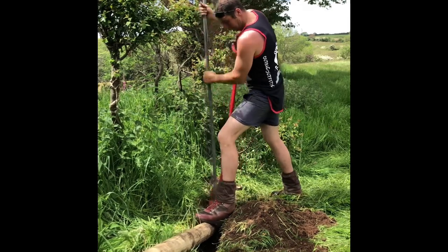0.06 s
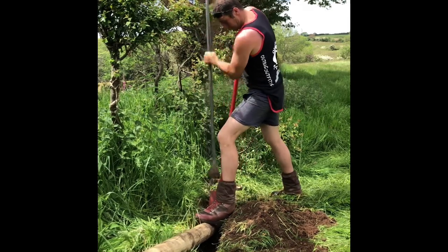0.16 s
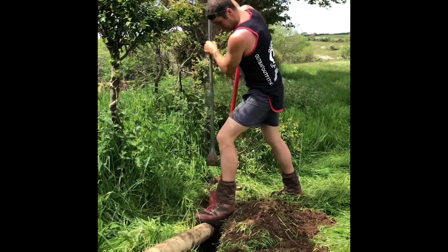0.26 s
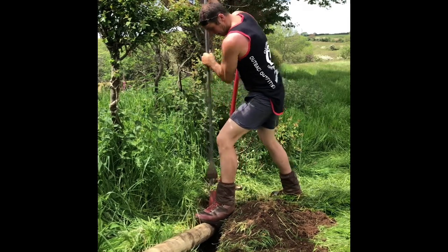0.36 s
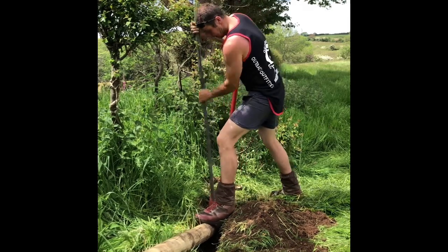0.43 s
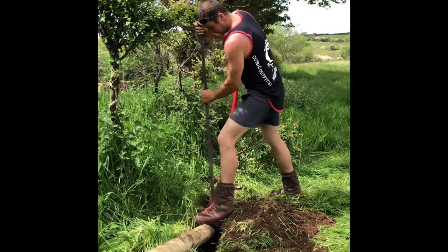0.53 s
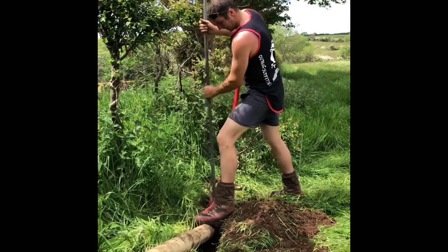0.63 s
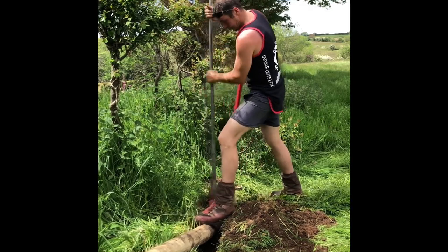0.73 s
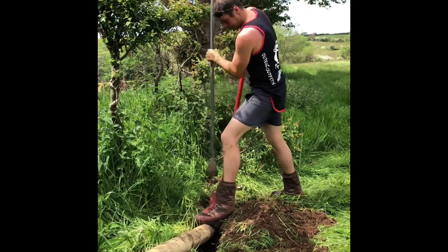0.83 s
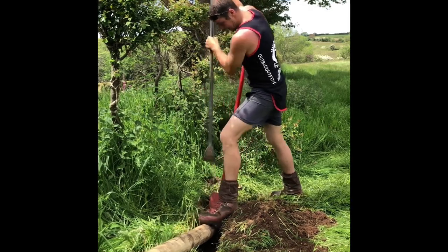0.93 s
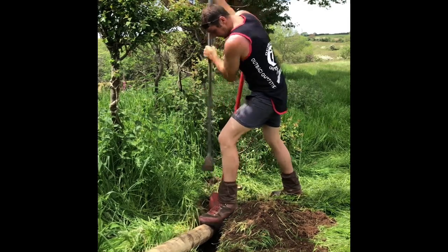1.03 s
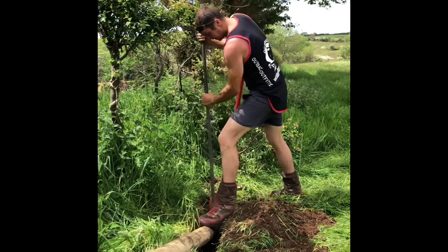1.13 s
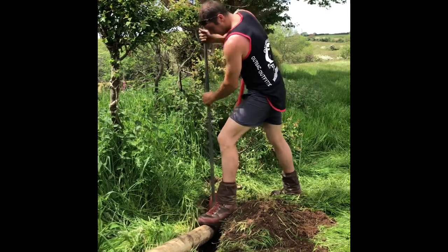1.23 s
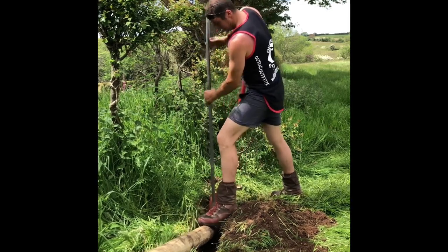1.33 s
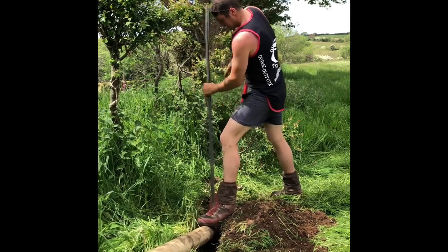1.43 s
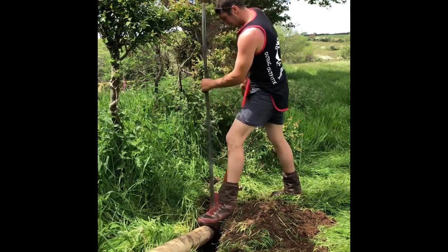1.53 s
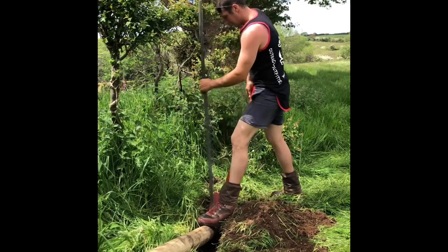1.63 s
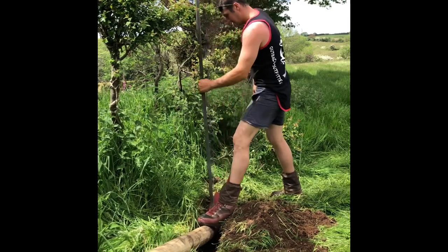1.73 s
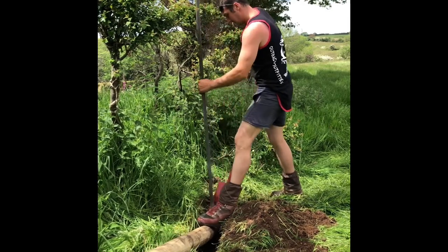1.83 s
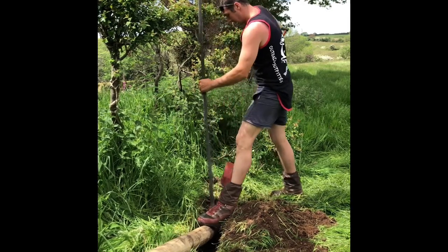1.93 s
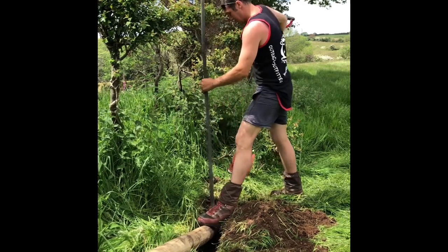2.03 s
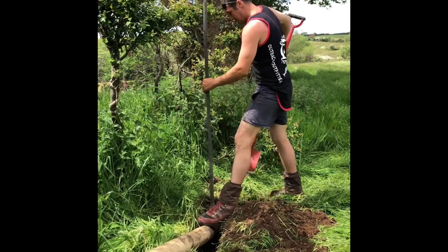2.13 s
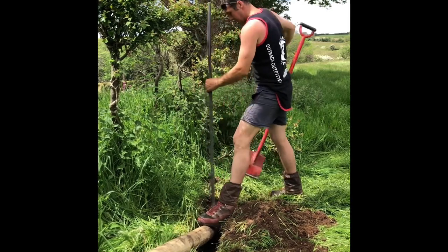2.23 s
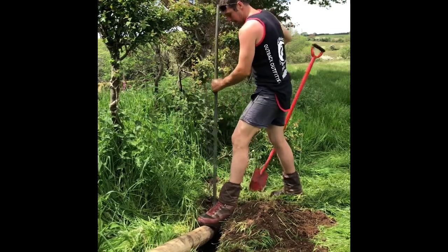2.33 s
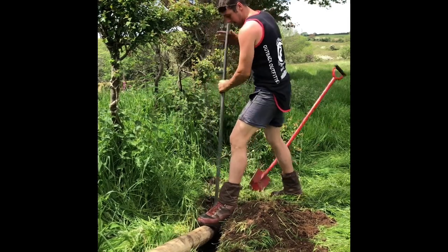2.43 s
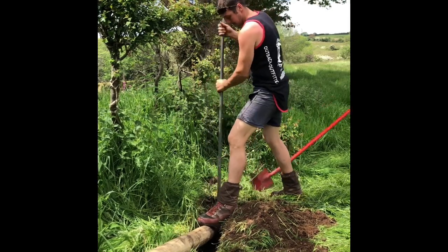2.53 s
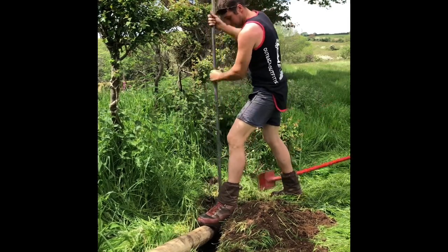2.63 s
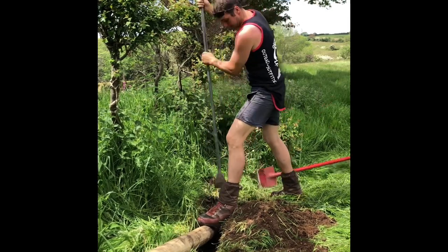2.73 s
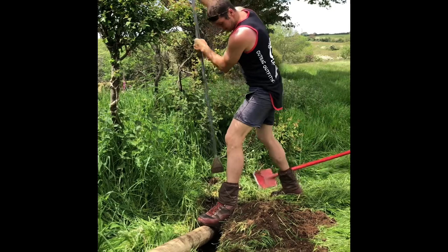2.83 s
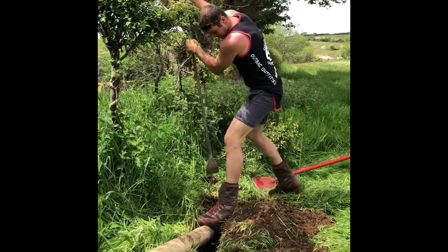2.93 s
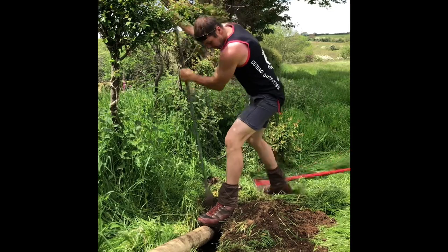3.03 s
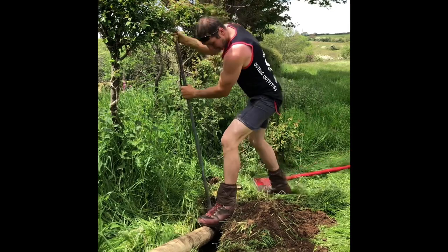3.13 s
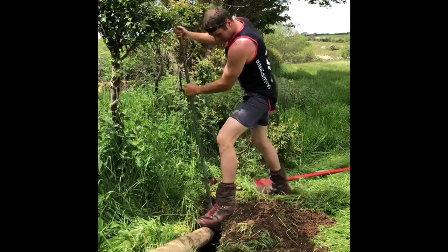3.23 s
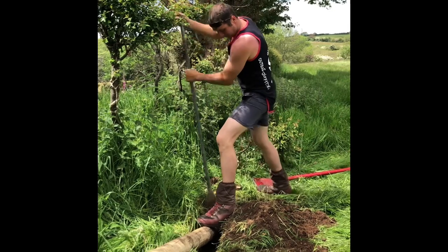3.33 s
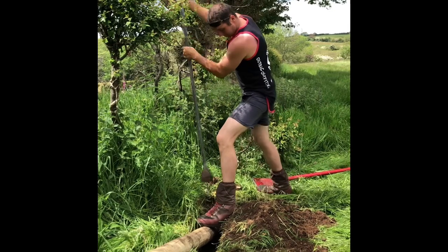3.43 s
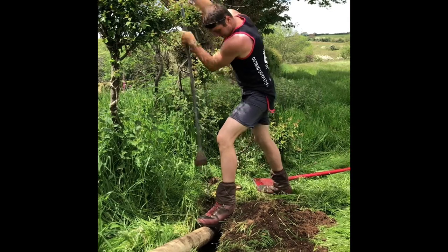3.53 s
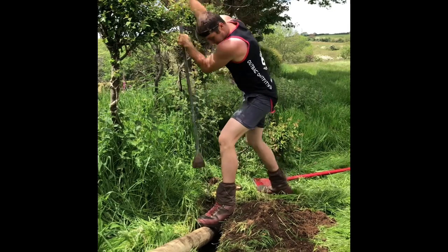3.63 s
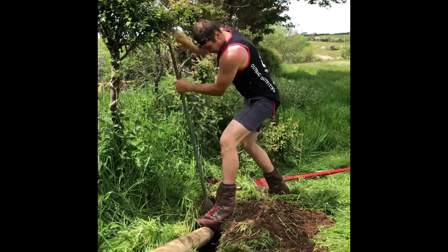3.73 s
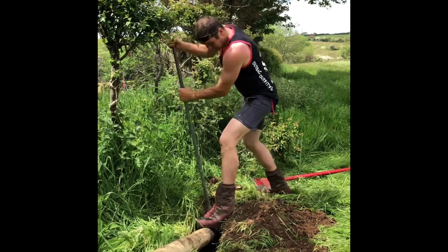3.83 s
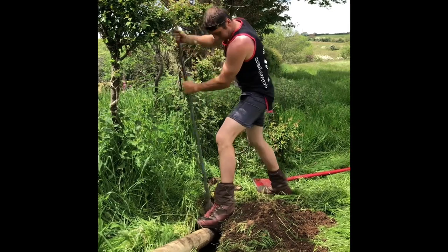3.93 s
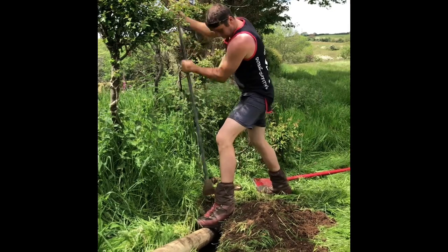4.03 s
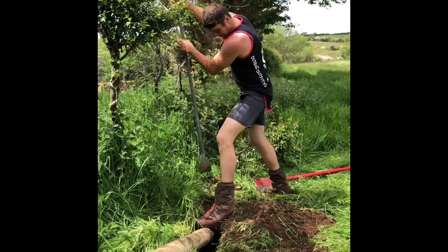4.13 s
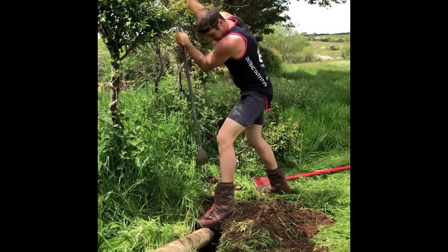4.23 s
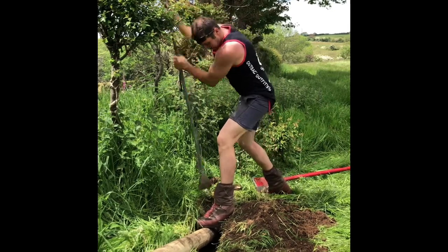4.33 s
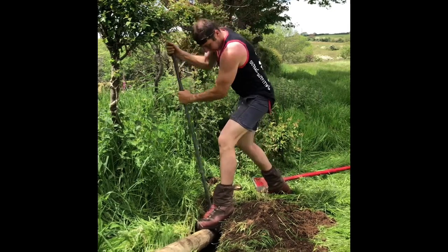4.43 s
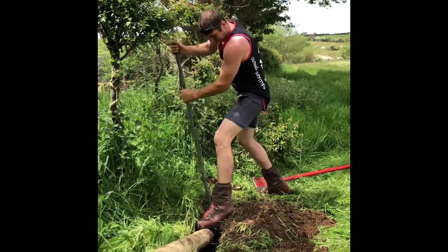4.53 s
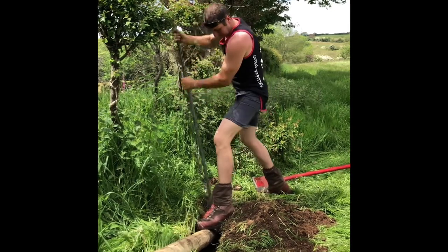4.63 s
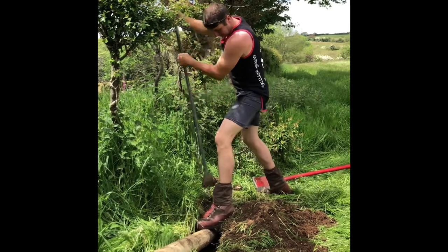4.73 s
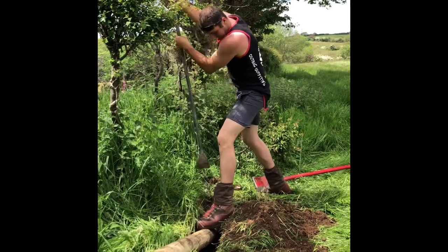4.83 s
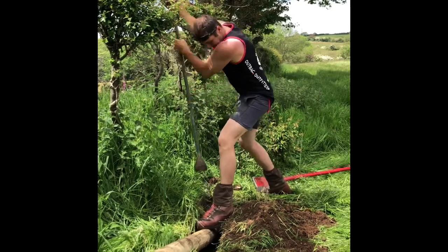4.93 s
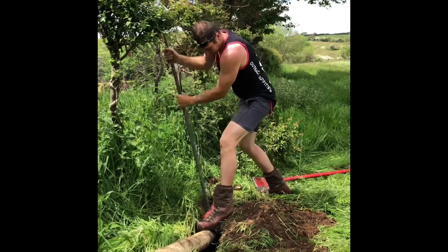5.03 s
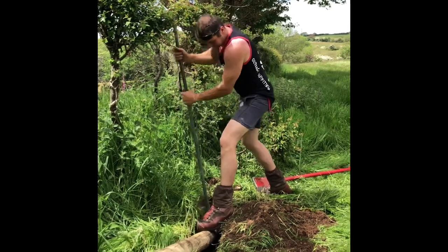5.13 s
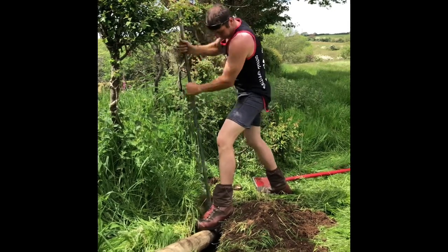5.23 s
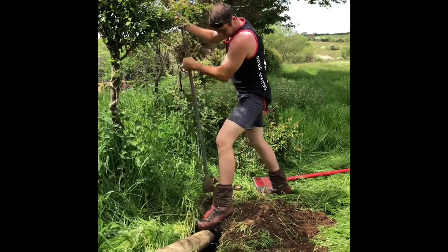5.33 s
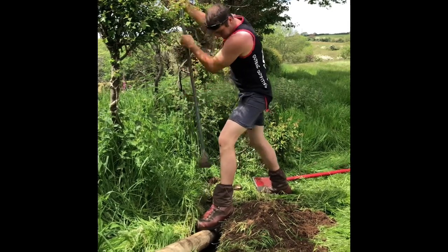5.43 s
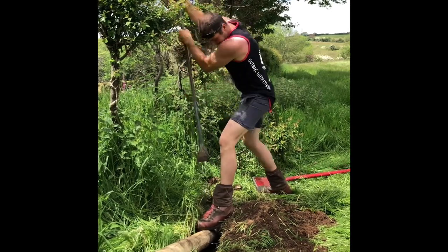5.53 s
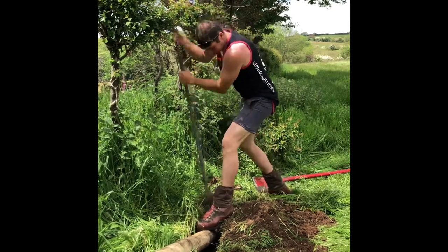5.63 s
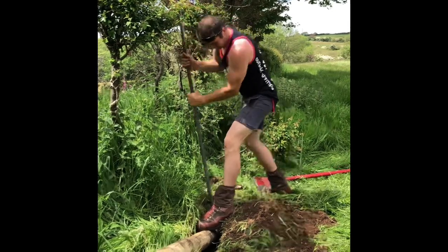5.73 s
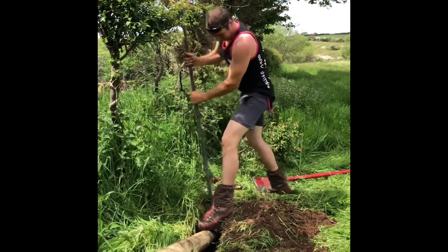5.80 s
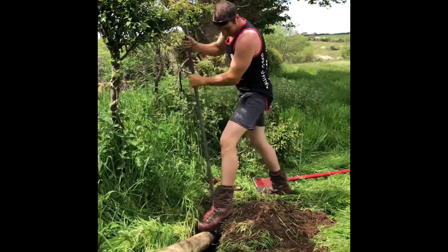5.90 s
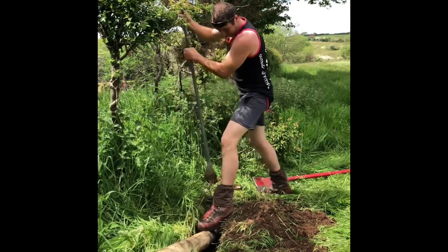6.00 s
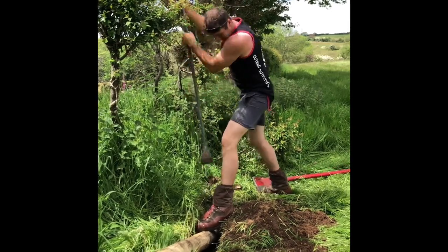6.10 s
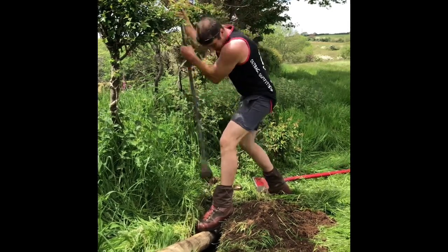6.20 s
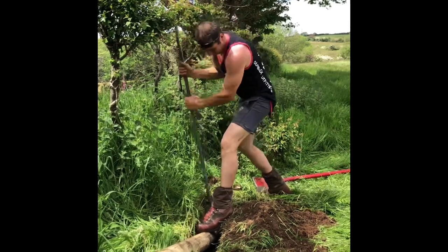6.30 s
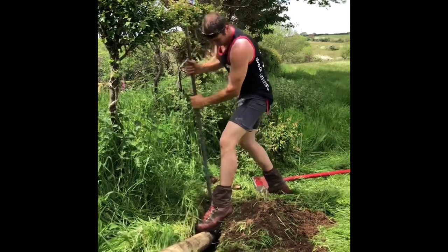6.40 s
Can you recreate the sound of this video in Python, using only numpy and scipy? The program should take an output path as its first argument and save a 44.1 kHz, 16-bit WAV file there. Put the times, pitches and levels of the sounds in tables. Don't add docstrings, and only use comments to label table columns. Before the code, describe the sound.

A steady low diesel chug and clatter lies quietly across a field. In front, very loud, dry blows of steel on a buried wooden post come about every two thirds of a second, broken by a two-second gap with grass swishes and a soft spade thump. Bright, tiny metal chinks follow the later blows. The close microphone limits each peak, ducking the background briefly.

```python
import sys
import numpy as np
from scipy import signal
from scipy.fft import rfft, irfft, next_fast_len
from scipy.io import wavfile
from scipy.ndimage import uniform_filter1d, minimum_filter1d, map_coordinates

SR = 44100
rng = np.random.default_rng(int(sys.argv[2]) if len(sys.argv) > 2 else 0)


def volts(x):
    e = np.asarray(x, float) / 20
    return 10 ** e


def output_pcm(signal):
    pcm = np.clip(np.atleast_2d(signal).T, -1, 1) * 32767
    wavfile.write(sys.argv[1], SR, np.round(pcm).astype(np.int16))


N = 284886


def unit(x):
    return x / np.sqrt(np.mean(x ** 2) + 1e-20)


def along(points, hz):
    f, v = np.transpose(points)
    return np.interp(np.log(hz + 1), np.log(f + 1), v)


def curves(rows):
    s, *cols = np.transpose(rows)
    return [np.interp(np.arange(N) / SR, s, c) for c in cols]


def wobble(rate):
    coarse = np.arange(0, N + 32, 32)
    knots = rng.standard_normal(int(N * rate / SR) + 4)
    return np.interp(np.arange(N), coarse, map_coordinates(knots, [coarse * rate / SR]))


def filtered(x, response):
    m = next_fast_len(len(x) + 8192)
    return irfft(rfft(x, m) * response(np.fft.rfftfreq(m, 1 / SR)), m)[:len(x)]


def noise(spectrum, size=N):
    m = next_fast_len(size)
    hz = np.fft.rfftfreq(m, 1 / SR)
    bins = rng.standard_normal(len(hz)) + 1j * rng.standard_normal(len(hz))
    return unit(irfft(bins * volts(along(spectrum, hz)), m)[:size])


def ring(modes, t, scatter_db, attack):
    hz, db, t60 = np.transpose(modes)[..., None]
    db = db + scatter_db * rng.standard_normal(db.shape)
    partials = volts(db - 60 * t / t60) * np.sin(2 * np.pi * hz * t)
    return np.sum(partials, axis=0) * (1 - np.exp(-t / attack))


def swell(s, db, rise, fall):
    t = np.arange(N) / SR - s
    return volts(db - 30 * np.maximum(-t / rise, t / fall))


def add(track, s, sound):
    part = track[round(s * SR):][:len(sound)]
    part += sound[:len(part)]


# (time [s], clatter level [dB])
LOAD = [(0.0, -56.5), (0.54, -55.5), (0.86, -59.5), (1.4, -58), (1.62, -62.5), (1.87, -59), (1.98, -59),
        (2.72, -59), (3.07, -52.5), (3.51, -58.5), (3.63, -56.5), (4.14, -59), (5.11, -57), (6.04, -58.5),
        (6.37, -60), (6.46, -57)]
# (multiple of the firing rate, level [dB])
EXHAUST = [(2, 0.5), (3, -3), (4, -21), (5, -16.5), (6, -18.5)]
# (time [s], level [dB])
WHINE = [(0, -69.5), (2.3, -81.5), (2.6, -65), (3, -71), (4.4, -67.5), (4.7, -59), (5.6, -58.5), (5.9, -77),
         (6.46, -59)]
# (frequency [Hz], level [dB per Hz])
RUMBLE = [(20, -41.5), (38, -16.5), (55, 1.5), (90, -2), (155, -5), (200, -13), (270, -17.5), (400, -28.5),
          (600, -53.5)]
# (frequency [Hz], level [dB per Hz])
DRONE = [(200, -32), (350, -5), (600, -4.5), (850, -0.5), (1300, -5), (2000, -4.5), (3000, -47.5)]
# (frequency [Hz], level [dB per Hz])
CLATTER = [(1000, -31), (1600, -6.5), (2200, -2), (2900, -7.5), (4000, -7), (4800, -11.5), (7000, -19),
           (10300, -23), (11200, -42), (16400, -56)]
# (frequency [Hz], width [Hz], level [dB])
CASING = [(1890, 310, -2.5), (2446, 85, -1.5), (3830, 300, -2), (4260, 250, -12.5), (6840, 270, -17)]


def machine():
    load_db, = curves(LOAD)
    extra_db = load_db - load_db.mean()
    rumble_db = -46 + 0.85 * extra_db
    drone_db = -60 + .8 * extra_db
    clatter_db = load_db - 2.2

    firings_per_s = 28.5
    turns = np.cumsum(firings_per_s + 0.17 * wobble(2.2)) / SR + .12
    tones = sum(volts(db + 2.5 * wobble(7)) * np.sin(2 * np.pi * k * turns) for k, db in EXHAUST)
    low = volts(rumble_db) * (1.4 * tones + .8 * noise(RUMBLE))
    whine = volts(curves(WHINE)[0] + 1.3 * wobble(5.7)) * np.sin(2 * np.pi * 10 * turns)

    gate = np.exp(-(turns % 1) / .2) * volts(1.8 * wobble(25))
    ticks = np.zeros(N)
    for hz, width, db in CASING:
        strikes = gate * volts(5.3 * wobble(22.0)) * rng.standard_normal(N)
        ticks += volts(db) * unit(filtered(strikes, lambda f: 1j * f * width / (hz * hz - f * f + 1j * f * width)))

    unsteady = volts(1.1 * wobble(10))
    drone = volts(drone_db + .6) * unsteady * noise(DRONE)
    clatter = volts(clatter_db) * (.95 * unsteady * noise(CLATTER) + .5 * ticks)
    return low + whine + drone + clatter


# (blow time [s], downstroke level [dB], shock level [dB], lift delay [s], lift level [dB])
SHAKES = [
    (-.2, -90, -70, 0.21, -77),
    (0.477, -77.5, -54.5, .15, -76.5),
    (1.161, -80.5, -68.5, 0.28, -76),
    (3.103, -86, -70, 0.18, -97.5),
    (3.788, -75, -49, 0.27, -68),
    (4.427, -81, -46.5, .26, -75),
    (5.072, -63, -49, .265, -72),
    (5.705, -75, -41.5, 0.28, -72),
    (6.316, -79, -43, .25, -65),
]
# (time [s], level [dB])
JINGLE = [(3.9548, -60.5), (3.972, -63), (4.0153, -48), (4.0542, -57.5), (4.6767, -57), (4.6848, -61),
          (5.2552, -68), (5.3273, -55.5), (5.929, -66), (5.9589, -60), (6.0292, -55), (6.4228, -52)]
# (frequency [Hz], level [dB], t60 [s])
COLLAR = [(10600, -6, .09), (10680, 0, 0.084), (10730, -3, 0.09)]


def collar():
    t = np.arange(SR // 6) / SR
    shaking = np.zeros(N)
    for s, down_db, shock_db, lift, lift_db in SHAKES:
        shaking += swell(s - .015, down_db, rise=.12, fall=.02)
        shaking += swell(s + 0.028, shock_db, rise=.04, fall=0.092)
        shaking += swell(s + lift, lift_db, rise=.3, fall=0.14)
    contacts = rng.standard_normal(N) * (rng.random(N) < 350 / SR) * shaking
    modes = ring(COLLAR, t, scatter_db=3.0, attack=0.00055)
    out = volts(25.5) * signal.fftconvolve(contacts, modes / np.linalg.norm(modes))[:N]
    for s, db in JINGLE:
        tick = volts(-60 * t / .006) * rng.standard_normal(len(t))
        add(out, s, volts(db - 5) * (ring(COLLAR, t, scatter_db=8.0, attack=.001) + .3 * tick))
    return out


# (peak time [s], hiss level [dB], rise [s], fall [s], body level [dB])
GRASS = [(0.01, -80, .1, .15, 0), (0.44, -80.5, .3, .05, -2), (0.98, -85, .06, .06, 0),
         (1.328, -68.5, .15, .08, 1.5), (2.382, -56.5, 0.018, .06, 2), (2.4, -64.5, 0.061, .07, -4),
         (2.495, -70, .04, .12, -1), (2.555, -73.5, .05, .1, -5), (2.706, -51, 0.052, .045, -1.5),
         (2.74, -76.5, .05, .2, 2.5), (3.08, -69.5, .4, .05, 10.5), (4.014, -73.5, .15, .2, 4),
         (4.68, -83, .04, .08, 2), (5.045, -73, .2, .05, 3.5), (5.95, -74, .3, .2, 0.5),
         (6.028, -75, .03, .08, 0)]
# (frequency [Hz], level [dB per Hz])
BLADES = [(2000, -41), (4000, 3), (8000, 2), (15500, -1.5), (16500, -39)]
# (frequency [Hz], level [dB per Hz])
STALKS = [(300, -37.5), (900, 0.5), (3000, -1), (6000, -6.5), (10000, -26.5)]


def grass():
    hiss = sum(swell(s, db, rise, fall) for s, db, rise, fall, _ in GRASS)
    body = sum(swell(s, db + body_db, rise, fall) for s, db, rise, fall, body_db in GRASS)
    blades = volts(4.0 + 2.81 * wobble(150)) * hiss * noise(BLADES)
    stalks = volts(-3.5 + 1.9 * wobble(120)) * body * noise(STALKS)
    return blades + stalks


# (frequency [Hz], level [dB per Hz])
DIRT = [(200, -33), (350, -14.5), (950, -9.5), (1500, -19.5), (3000, -30.5), (5250, -36), (10000, -37.5),
        (15000, -44.5), (16400, -60)]
# (frequency [Hz], t60 [s])
DIRT_DECAY = [(300, 0.3), (1000, 0.19), (4000, 0.26), (16000, 0.16)]


def debris(t, bright_db, delay):
    hz, frames, z = signal.stft(noise(DIRT, size=len(t)), SR, nperseg=256)
    tilt_db = bright_db * np.log2(hz[:, None] / 1000 + 0.41)
    fade = volts(-60 * frames / along(DIRT_DECAY, hz)[:, None] + tilt_db)
    starts = (rng.random(len(t)) < 140 / SR) * rng.random(len(t))
    clumps = 1 + 1.6 * signal.lfilter([1], [1, -np.exp(-1 / (.004 * SR))], starts)
    rise = 0.4 * (1 - np.exp(-t / 0.0023)) + 0.33 * np.clip((t - delay) / 0.0066, 0, 1)
    return signal.istft(z * fade, SR, nperseg=256)[1][:len(t)] * clumps * rise


def bending(hz, turns, floor_hz, delay):
    return np.exp(-2j * np.pi * (turns * np.log(hz + floor_hz) + hz * delay))


# (time [s], peak level [dB], thud level [dB], steel level [dB])
BLOWS = [
    (0.477, 4, -2, 1),
    (1.1625, 3, -1, 6.5),
    (3.103, -1, 0, 6.5),
    (3.787, -1.5, 0, 8.5),
    (4.4263, 0, 2.5, 6),
    (5.0709, 4, -1, 1),
    (5.7034, 1, 2, 2),
    (6.315, 2.5, 1.5, 1.5),
]
# (debris delay [s], debris level [dB], brightness [dB per octave])
SOIL = [(0.02078, -16.5, 2), (0.019, -17, 0.9), (.016, -18, 0.5), (.015, -18.5, 1), (.018, -17, 0.5),
        (.016, -15, 0), (.023, -15, 0), (.021, -15.5, 0)]
# (frequency [Hz], level [dB], t60 [s])
POST = [(56.7, -33.5, 0.098), (80.6, -7.5, 0.073), (102.8, -8, 0.15), (159, -15, 0.12), (215.5, -2, 0.13),
        (284, -11, 0.055), (354.7, -4, 0.14), (405, -8.5, 0.028), (529, -11.5, 0.14), (667, -33, 0.18),
        (706.4, -14.5, 0.17), (959, -2, 0.046), (1233, -22, 0.035), (1510, -19.5, 0.11)]
# (frequency [Hz], level [dB])
KNOCK = [(90, -24), (150, -9), (220, -3), (350, 5), (600, 0), (950, 0), (1200, -9), (1500, -22),
         (2500, -50)]
# (frequency [Hz], level [dB], t60 [s])
BAR = [(450, -9, .012), (920, 3, .011), (1480, -4, .011), (1970, 0, .017), (2290, -4, .014),
       (2534, -6, .02), (2710, -6, .02), (3050, -12, .02), (3500, -17, .012), (4430, -12, .02),
       (5000, -19, .012), (5500, -21, .015), (6500, -22, .015), (9700, -33, .02)]


def blows():
    out, t = np.zeros(N), np.arange(SR // 3) / SR
    for (s, db, thud_db, steel_db), (delay, dirt_db, bright_db) in zip(BLOWS, SOIL):
        grip = np.exp(-(t / 0.1) ** 4)
        post = filtered(ring(POST, t, scatter_db=1.0, attack=0.00034) * grip,
                        lambda hz: bending(hz, turns=4.1, floor_hz=80, delay=0.00087))

        late = .0026 + .0002 * rng.standard_normal()
        knock = filtered(1. * (t == 0), lambda hz: volts(along(KNOCK, hz) + bright_db * np.log2(hz / 600 + 0.11))
                         * bending(hz, turns=4.5, floor_hz=250.2, delay=late))

        detune = 1 + .006 * rng.standard_normal((len(BAR), 1)) * [1, 0, 0]
        head = ring(BAR * detune, t, scatter_db=2.5, attack=0.0023) * (1 - np.exp(-(t / .0012) ** 2))

        crack_colour = [(1500, -18.0), (3000, -0.5), (8000, -13), (12000, -22.5), (16000, -31.5)]
        crack = np.exp(-((t - .0075) / 0.0038) ** 2) * noise(crack_colour, size=len(t))

        impact = volts(thud_db - 3.5) * post + volts(36.5) * knock
        impact += volts(steel_db - 4.5) * head + volts(bright_db - 20.5) * crack
        add(out, s - .0024, volts(db) * impact)
        add(out, s - .0024, volts(dirt_db) * debris(t, bright_db, delay))

        lead = t[:SR // 40]
        lead_colour = [(200, -25.0), (400, 2.0), (1200, -6.5), (2500, -23.0), (5000, -59.0)]
        rustle = np.sin(np.pi * lead / lead[-1]) ** 0.92 * noise(lead_colour, size=len(lead))
        add(out, s - .025, volts(db - 44.5) * rustle)
    return out


# (time [s], level [dB], frequency [Hz], t60 [s], pitch change as a share per
# .0175 s)
THUDS = [(1.007, -36, 210, .15, 0), (2.03, -42, 160, .3, 0), (2.38, -36, 200, .1, 0),
         (2.49, -46, 300, .05, 0), (2.712, -23, 140, .1, -.1), (2.70, -33, 380, .04, 0),
         (2.702, -32, 240, .05, 0), (2.715, -29, 95, .2, 0), (2.70, -39, 680, .03, 0),
         (2.85, -49, 1380, .3, 0), (3.03, -50, 5420, .2, 0), (4.583, -46, 4000, .05, 0),
         (1.427, -55, 5600, .2, 0), (1.427, -62, 7600, .15, 0), (1.38, -48, 2500, .08, 0),
         (5.868, -38, 445, .16, -.08), (.615, -52, 1490, .2, 0), (2.375, -56, 4500, .15, 0)]
# (time [s], level [dB], t60 [s])
PUFFS = [
    (2.385, -45.5, 0.079),
    (2.7, -36, .1),
]
# (frequency [Hz], level [dB per Hz])
SOFT = [(60, -20.5), (120, 1), (300, -2.5), (700, -12), (1500, -32)]


def thuds():
    out, t = np.zeros(N), np.arange(SR // 5) / SR
    for s, db, hz, t60, change in THUDS:
        bent = t + change * t ** 2 / 0.035
        modes = [(hz, db, t60), (hz * 1.6, db - 14, t60 * .5)]
        add(out, s, ring(modes, bent, scatter_db=0, attack=.008))
    for s, db, t60 in PUFFS:
        shape = volts(db - 60 * t / t60) * (1 - np.exp(-t / 0.0062))
        add(out, s, shape * noise(SOFT, size=len(t)))
    return out


# (time [s], peak level [dB], brightness [dB per octave], t60 [s], ring level [dB])
BANGS = [(1.379, -38.5, -1.5, 0.58, -4), (1.396, -30.5, -2, 0.7, 5), (1.604, -37.5, 0.5, 0.37, -6),
         (1.924, -37, 2, 0.58, 6.5), (1.968, -32.5, -4, 0.78, 7), (3.005, -33.5, -1, 1, 7.5),
         (3.358, -29, -2.5, 1, 0), (3.388, -22, 2, 0.46, 3), (3.591, -36.5, -3, 0.25, -1.5),
         (3.676, -36.5, -7.5, 0.66, 2.5), (6.094, -38.5, -2.5, 0.99, 2)]
# (frequency [Hz], level [dB per Hz])
FAR_STEEL = [(240, -34.5), (400, -12), (461, -32.5), (524, -4.5), (677, -5.5), (900, -6), (1270, -4.5),
             (2540, -6.5), (3430, -14), (3840, -12.5), (4970, -21), (6700, -24.5), (9970, -38),
             (12000, -47.5), (15600, -78), (22000, -120)]
# (frequency [Hz], level [dB], share of t60)
FAR_RING = [(750, 4.5, 0.9), (766, -2.5, 1), (1440, 0.5, 1), (1900, 1.5, 0.58), (2400, -7, 0.47),
            (3750, -10.5, 0.83), (6500, -23, .4)]


def bangs():
    out, t = np.zeros(N), np.arange(SR // 2) / SR
    for s, db, bright_db, t60, ring_db in BANGS:
        colour = [(hz, level + bright_db * np.log2(hz / 1500)) for hz, level in FAR_STEEL]
        shape = (volts(-60 * t / t60) + 0.28 * volts(-60 * t / 0.017)) * (1 - np.exp(-t / 0.0004))
        blur = np.interp(t, t[::400], .5 + .8 * rng.standard_normal(len(t[::400])))
        grain = volts(2.84 * np.interp(t, t[::128], rng.standard_normal(len(t[::128]))))
        modes = [(hz, level, share * t60) for hz, level, share in FAR_RING]
        steel = blur * ring(modes, t, scatter_db=2.5, attack=0.0079)
        echo = shape * grain * noise(colour, size=len(t))
        add(out, s, volts(db - 14) * (echo + volts(ring_db - 10.5) * steel))
    return out


def scene():
    return (machine() + collar() + grass() + blows() + thuds() + bangs())[None]


def low_pass(x):
    return signal.sosfilt(signal.butter(12, 16990, fs=SR, output="sos"), x)


def record(dry):
    top_hz, edge_hz = 15750, 250
    x = filtered(dry[0], lambda hz: np.clip((top_hz - hz) / edge_hz + .5, 0, 1) * (1j * hz / (42 + 1j * hz)) ** 4)
    over_db = np.maximum(20 * np.log10(np.abs(x) + 1e-9) + .6, 0)
    release = 250 * np.arange(N) / SR
    held_db = np.maximum.accumulate(over_db + release) - release
    cut_db = uniform_filter1d(-minimum_filter1d(-held_db, size=45), size=23)
    return low_pass((x * volts(-cut_db))[None])


dry = scene()
out = record(dry)
output_pcm(out)
```